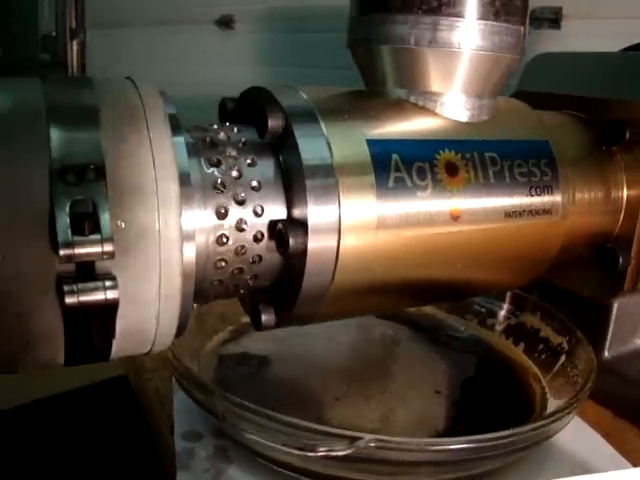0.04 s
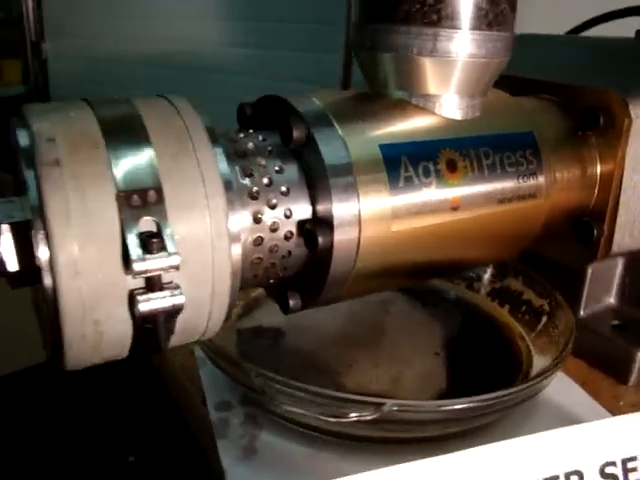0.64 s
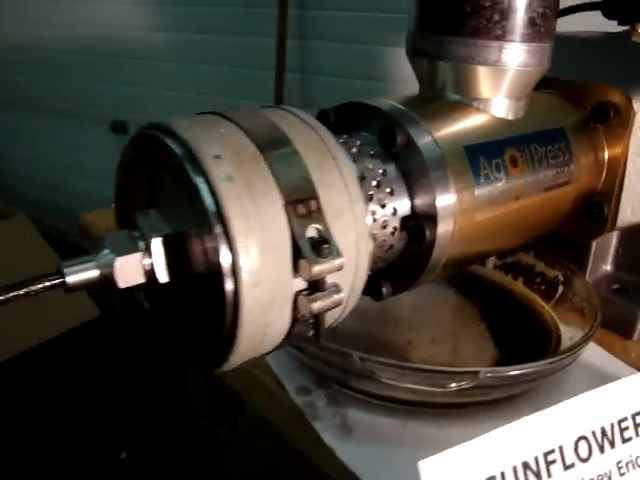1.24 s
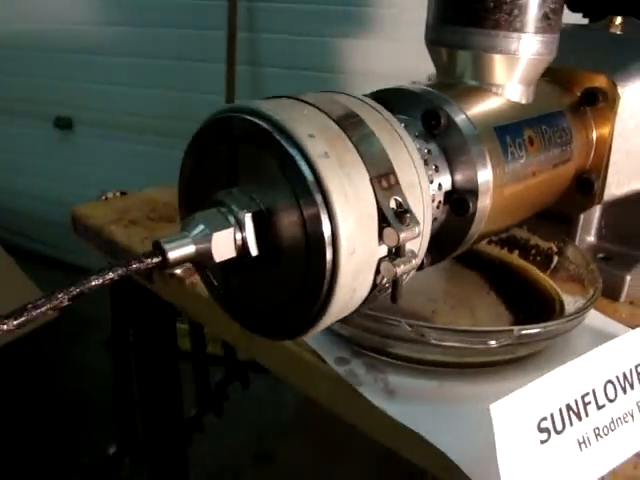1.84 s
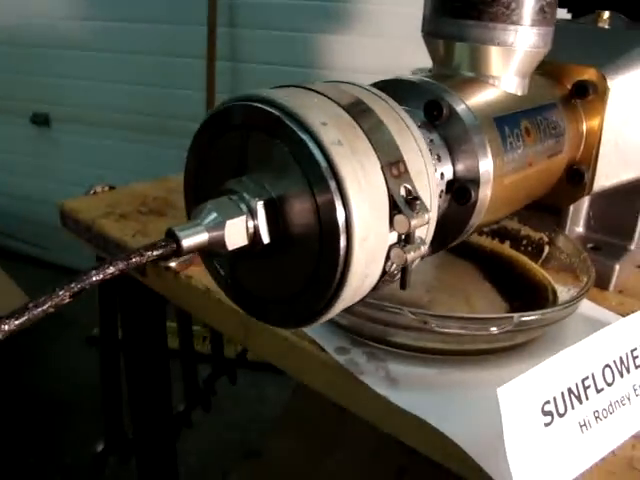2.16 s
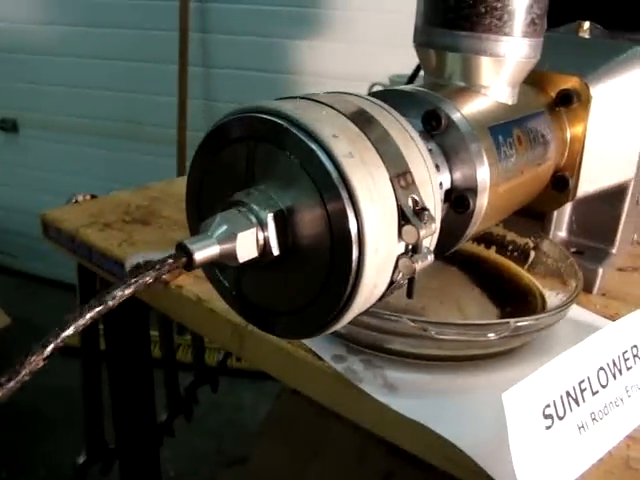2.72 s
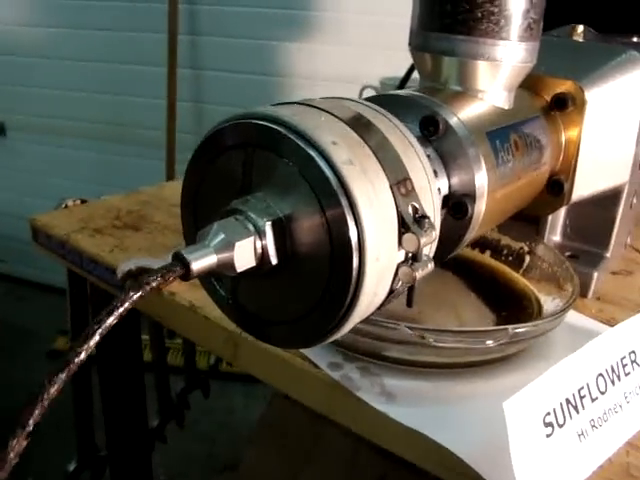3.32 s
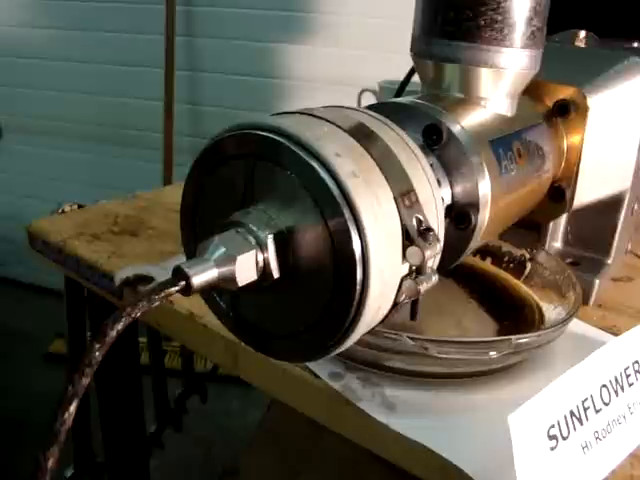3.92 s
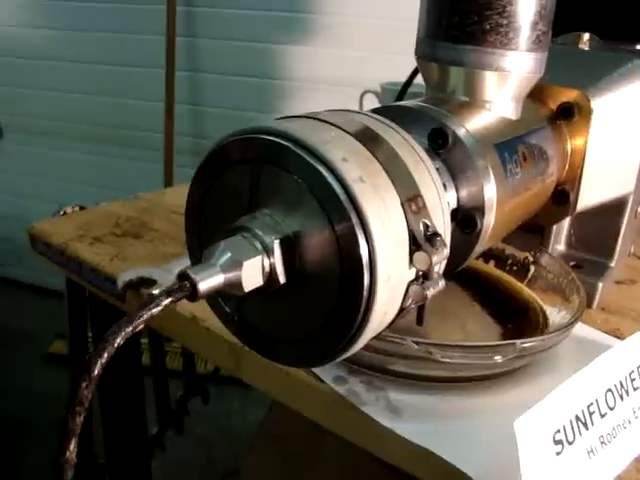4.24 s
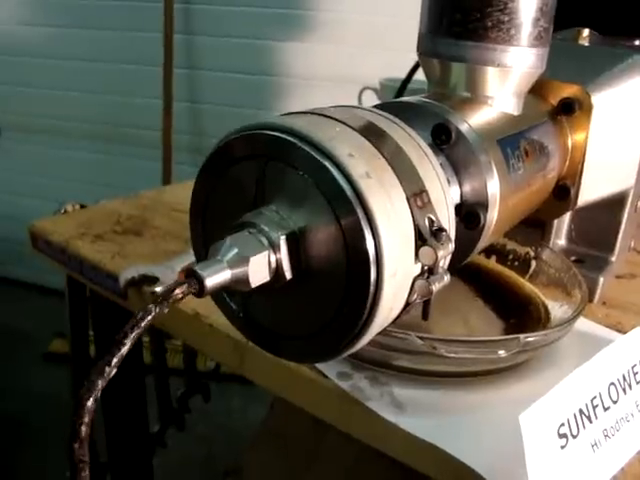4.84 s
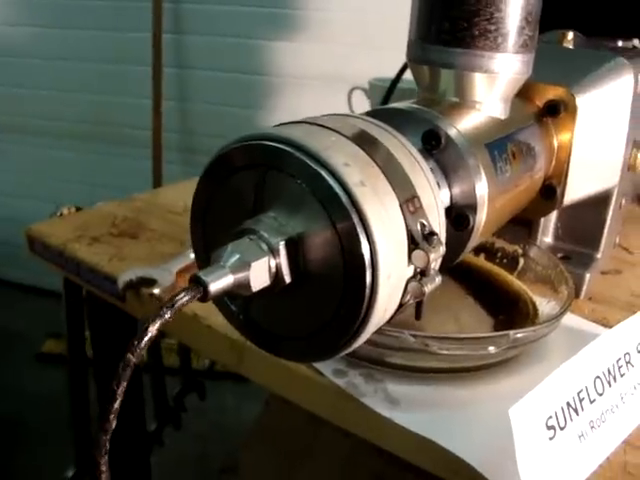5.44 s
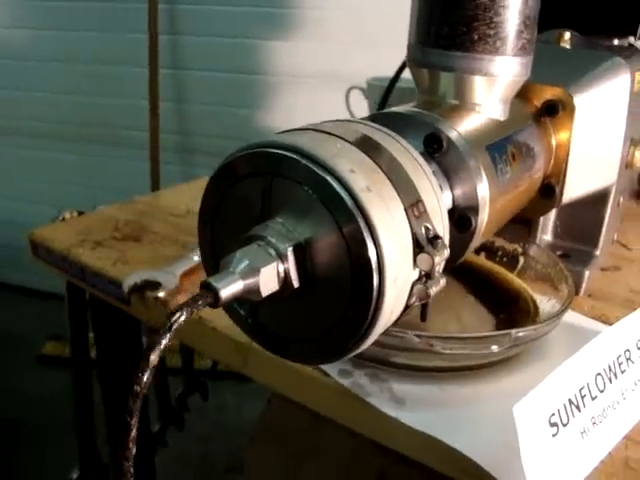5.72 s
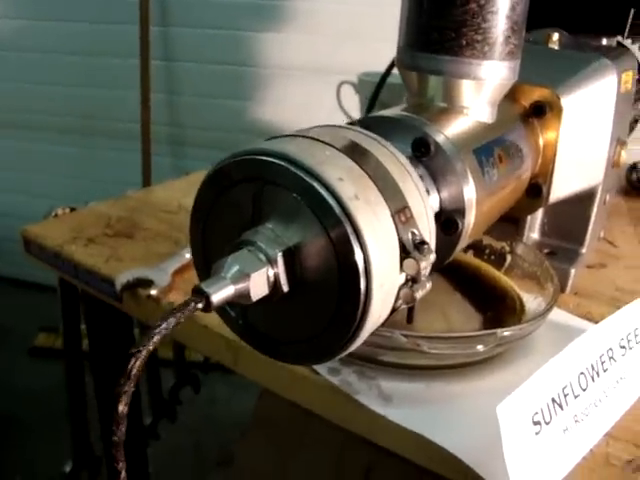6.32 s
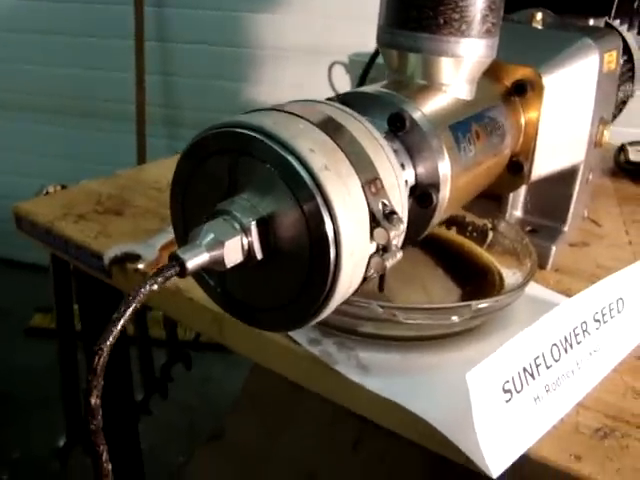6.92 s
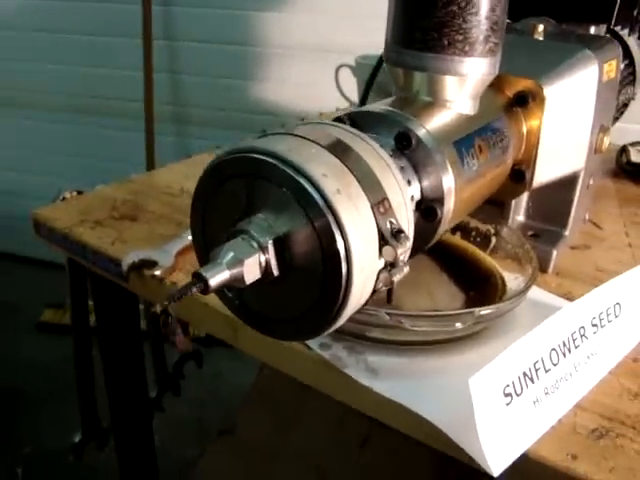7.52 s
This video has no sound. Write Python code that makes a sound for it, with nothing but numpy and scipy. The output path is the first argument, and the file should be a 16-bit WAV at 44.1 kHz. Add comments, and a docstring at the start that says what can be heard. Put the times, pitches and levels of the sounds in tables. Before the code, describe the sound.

An electric screw press runs close to the microphone in a workshop, its gearbox humming with a fast, rattling throb beneath a steady high motor whine. About half a second in, something hard bangs down and the room rings briefly. The machine dips in level, then recovers. Its tone shifts slightly as the microphone moves, while seed hulls crack faintly and the pressed cake crunches softly near the end.

```python
"""A workshop, with a camera microphone close to an electric screw press squeezing seeds. We start beside
the barrel: the gearbox growls once per shaft turn and the inverter-fed motor whines near 6 kHz.
At 0.4 s something hard bangs down, the room rings and the gain control ducks. The microphone swings
through the shadow of the press head round to the nozzle, while hulls crack faintly and the seed cake
rasps. The cake crunches near 5.9 s and crumbles off just after 7 s."""
import sys
import numpy as np
from scipy import signal
from scipy.fft import rfft, irfft, next_fast_len
from scipy.io import wavfile
from scipy.ndimage import uniform_filter1d, minimum_filter1d, map_coordinates

SR = 44100
rng = np.random.default_rng(int(sys.argv[2]) if len(sys.argv) > 2 else 0)


def persist_wave(psi):
    """Save psi, clipped to +-1, as 16-bit WAV."""
    counts = np.round(np.clip(psi, -1, 1) * 32767).astype(np.int16)
    wavfile.write(sys.argv[1], SR, np.atleast_2d(counts).T)


N = 338247

# Tones of the meshing gears: shaft_multiple, level_db
GEAR_TONES = [(13, -49.6), (14, -52.6), (16, -58), (17, -58), (20, -59), (22, -57), (26, -55), (27, -57),
              (39, -52), (40, -55), (45, -52), (46, -56), (47, -51), (48, -46.5), (49, -50), (50, -52),
              (51, -41.5), (52, -37.3), (57, -54), (64, -51), (65, -49), (70, -42), (72, -53), (73, -51),
              (74, -53), (75, -51), (76, -46), (77, -39.6), (78, -35), (79, -48), (80, -54), (81, -52),
              (83, -52), (84, -53), (85, -54), (86, -54), (89, -53), (107, -60)]
# Gear tones that change with microphone position: shaft_multiple, beside_barrel_db, in_shadow_db
GEAR_LOBES = [(13, 3.5, 0.5), (51, 1, 1.5), (52, 1.5, 4.5), (64, 5, 2), (65, 5, 2), (70, 4, 3),
              (77, -10, 1), (78, -3, -8.5)]
# Hum of mains, fan and slower gears, with thin metallic overtones: pitch_hz, level_db
HUM_TONES = [(112.4, -79), (119.8, -72), (279.3, -53), (342.5, -58), (360, -60.5), (460.3, -54.5),
             (466, -55.5), (519.5, -44), (592.8, -57.5), (666.7, -49), (669.5, -49.5), (755, -50),
             (757.4, -53), (853.5, -54.5), (1025.3, -50.5), (1040.3, -48), (1154, -52), (1530, -54),
             (1585.4, -56.5), (2148, -61.5), (2314.8, -54.3), (2352, -59.5), (2654, -61.5), (3548, -70.5),
             (3612, -65.5)]
# Broad spectrum of the gearbox rattle: frequency_hz, density_db_per_hz
RATTLE_SPECTRUM = [(25, -99), (110, -88.5), (155, -86), (185, -70.5), (450, -68), (520, -63.5),
                   (650, -67.5), (1250, -57.5), (1370, -67), (2000, -74), (3000, -77), (4300, -86.5),
                   (5000, -99.5)]
# Resonances of the gearbox housing: centre_hz, width_hz, lift_db
HOUSING_MODES = [(686, 208, 9), (1046, 120, 9), (1520, 29, 5), (2136, 176, 7.5), (2310, 82, 8),
                 (2693, 505, 6.5), (3067, 52, 8.5), (3743, 360, 8.5)]
# Inverter sidebands and their standing waves:
# supply_multiple, level_db, reflected_share, node_cm, node_spacing_cm
WHINE_SIDEBANDS = [(-5, -47.7, .58, 4.7, 6.55), (-1, -39.8, .36, 4.15, 5.9), (1, -38.1, .23, 1.68, 8.5),
                   (5, -39.2, .61, 1.68, 12.24)]
# Weaker tones of the motor's iron: pitch_hz, level_db, reflected_share, node_cm, node_spacing_cm
IRON_TONES = [(5451.9, -49.2, .36, 1, 9.8), (5629.6, -53.3, .44, 3.1, 6.6), (5799.8, -51.5, .3, 3.8, 5.5),
              (6373.2, -52, .35, 1, 5.4), (6550.8, -52.5, .55, 12.8, 26)]
# Switching hiss of the inverter: frequency_hz, density_db_per_hz
HISS_SPECTRUM = [(5050, -82.5), (5400, -78), (5500, -73.5), (5900, -73), (6200, -68.5), (6500, -72.5),
                 (6640, -80.5), (7100, -93.5), (8000, -88), (9000, -86), (10000, -97)]
# Level of the motor at the moving microphone: time_s, gain_db
MOTOR_LEVEL = [(0, 1), (.85, 1), (1.14, 0), (1.27, 1.5), (2.1, 0.6), (4.9, -0.5), (5.6, 0), (6.6, 1.3),
               (7.67, -1)]
# Colour of the whine as the microphone rounds the head: time_s, outer_sidebands_db, inner_sidebands_db
WHINE_COLOUR = [(0, -3, -2), (.7, -1.5, 1), (.95, 0, 1.5), (1.16, -7, 0), (1.25, 2.5, -1),
                (1.65, 1.5, -4.5), (2.1, -3, -3)]
# The hard thing's landing and bounce: start_s, gain_db
BLOWS = [(0.4126, 5.6), (0.422, 4.9)]
# Colour of one blow: frequency_hz, gain_db
THUD_SPECTRUM = [(30, -34.5), (130, -15.5), (300, -8.5), (550, -3.5), (1200, -6), (2200, -10),
                 (3500, -19.5), (5200, -29.5), (10000, -37.5)]
# Reflections off a surface close by and a far wall: delay_s, reflected_share
REFLECTIONS = [(.0031, .8), (.0383, .45)]
# Modes that ring after a blow: pitch_hz, width_hz, gain_db
STRUCK_MODES = [(342, 80, -9.5), (539, 5.8, 7), (554, 17, -6), (602, 66, -8.5), (660, 8.6, -10),
                (973, 12, -1), (1190, 4, 0), (1690, 4, 1), (2137, 4, 1.5)]
# The loudest cracks of hulls and cake: start_s, level_db, pitch_hz, width_hz
LOUD_CRACKS = [(.123, -36, 3500, 2500), (.256, -40, 4000, 1500), (.2565, -46, 8200, 2500),
               (.865, -28.5, 2300, 2200), (.914, -44, 6300, 4000), (1.531, -38, 2900, 500),
               (1.895, -48, 8500, 2500), (3.2445, -31, 2950, 400), (4.6397, -39, 9700, 1500),
               (5.3537, -45.5, 9900, 1300), (5.826, -38, 2950, 900), (5.858, -32, 4200, 1000),
               (5.865, -35.5, 3700, 2000), (5.881, -45, 7900, 1500), (6.236, -37, 3350, 800),
               (6.433, -39, 3100, 1200), (6.881, -37, 4650, 900), (7.1608, -35, 7950, 1200),
               (7.2578, -37, 9400, 2200), (7.4425, -42.5, 9200, 3500), (7.4435, -32.5, 4250, 700)]
# Gritty crunches of the cake: centre_s, spread_s, crack_level_db, pitch_hz
CAKE_CRUNCHES = [(5.86, .022, -44, 3900), (7.32, .012, -51, 8500)]
# The cake rasping in the nozzle: centre_s, half_length_s, gain_db
CAKE_RASPS = [(1.72, .2, -1), (3.632, 0.14, -1.5), (5.634, 0.081, 1.5)]
# Colours of the seed's sizzle and the cake's rasp: frequency_hz, gain_db
SIZZLE_SPECTRUM = [(2500, -3.5), (4500, 3), (6800, -9.0), (8000, 2.5), (10000, -5.0)]
RASP_SPECTRUM = [(1500, -15), (3800, 8.5), (4800, 7.5), (7000, -6), (10000, -7.5)]
# Reverberation of the workshop: frequency_hz, t60_s
ROOM_DECAY = [(150, 0.98), (500, 0.75), (1500, 0.75), (3000, 0.77), (9000, 0.54)]
# The microphone swings from beside the barrel round to the nozzle, then drifts: time_s, travel_cm
MIC_PATH = [(0, 0), (.5, 1.2), (1.2, 5.3), (2.4, 9.86), (4.9, 11), (5.4, 13.67), (7.67, 16.8)]

SHAFT_HZ, SPEED_SWING_HZ, GEAR_RATIO = 14.337, .015, 23.5  # ratio: motor turns per turn of the screw
CARRIER_HZ, SUPPLY_HZ = 6001.4, 29.54  # the inverter's switching rate and the supply it makes


def gearbox(tight_spot_turns=.75, clatter_lag_turns=.67, tones_db=-.5, rattle_db=-4.5):
    """Gear tones and rattle swell around the tight spot of each turn, over the machine's hum."""
    _, beside, shadow = mic_position()
    turn = shaft_turns() - tight_spot_turns + .00051 * wobble(9)  # the load tugs at the shaft
    tones = amp(tones_db) * gear_tones(turn, beside, shadow)
    rattle = noise(housing) * amp(rattle_db + .47 * wobble(30))
    sound = tones + rattle + tooth_errors(turn) + screw_groan(turn)
    # Three bands radiate in different directions, and each throbs at its own point of the turn.
    drone = filtered(sound, lambda hz: 1 / (1 + (hz / 880) ** 16))
    mesh = filtered(sound - drone, lambda hz: 1 / (1 + (hz / 1400) ** 16))
    clatter = sound - drone - mesh
    drone_db = 4.5 * beside + .5 * np.cos(2 * np.pi * turn)
    mesh_db = -3 * shadow + .66 * np.sin(2 * np.pi * turn)
    clatter_db = beside + .5 * np.cos(2 * np.pi * (turn - clatter_lag_turns))
    return amp(drone_db) * drone + amp(mesh_db) * mesh + amp(clatter_db) * clatter + hum()


def gear_tones(turn, beside, shadow, waver_db=1.3):
    """Meshing teeth sing at multiples of the shaft speed; some tones beam to one side."""
    multiples, levels_db = np.transpose(GEAR_TONES)
    # Strong tones beat in step, the upper ones a quarter turn after the lower; weak ones stray.
    stray = (multiples > 14) & (levels_db < -44)
    lags = .005 * np.maximum(multiples - 50, 0) ** 2 + stray * rng.random(len(multiples))
    lobe_db = {k: side_db * beside + shade_db * shadow for k, side_db, shade_db in GEAR_LOBES}
    return sum(tone(k * turn - lag, db + lobe_db.get(k, 0) + waver_db * wobble(2.78))
               for k, db, lag in zip(multiples, levels_db, lags))


def tooth_errors(turn, lift_db=2.5, scatter_db=2.0, size=8192):
    """Uneven teeth repeat the same rough pattern every turn: a dense comb of weak tones."""
    multiples = np.arange(12, 170)
    db = housing(multiples * SHAFT_HZ) + lift_db + scatter_db * rng.standard_normal(len(multiples))
    comb = np.zeros(size // 2 + 1, complex)
    comb[multiples] = amp(db) * np.exp(2j * np.pi * rng.random(len(multiples)))
    comb[[round(k) for k, _ in GEAR_TONES]] = 0
    one_turn = irfft(comb) * size / np.sqrt(2)
    return np.interp(turn % 1, np.arange(size) / size, one_turn)


def housing(hz):
    """What the gearbox radiates, in dB per Hz: a broad rattle lifted by the housing's resonances."""
    lift_db = sum(db * np.exp(-(2 * (hz - centre) / width) ** 2) for centre, width, db in HOUSING_MODES)
    return along(RATTLE_SPECTRUM, hz) + lift_db - 20 * np.log10(1 + (hz / 5600) ** 12)


def screw_groan(turn, pitch_hz=271.0, level_db=-46.0, slack_db=-16):
    """A low groan under load that lets go briefly once per slow turn of the screw."""
    screw_turn = turn / GEAR_RATIO
    slack = (.5 + .5 * np.cos(2 * np.pi * screw_turn)) ** 3
    return tone(pitch_hz * np.arange(N) / SR, level_db + slack_db * slack)


def shaft_turns():
    """Turns of the motor shaft; the load slows it a little once per turn of the screw."""
    screw_turn = SHAFT_HZ / GEAR_RATIO * np.arange(N) / SR
    return np.cumsum(SHAFT_HZ + SPEED_SWING_HZ * np.cos(2 * np.pi * screw_turn)) / SR


def motor(whine_db=1.5, shadow_db=-3, waver_db=1.5, iron_waver_db=3.0, twist_cycles=.14):
    """The inverter's carrier, split by the supply frequency, sings in the motor's iron."""
    t = np.arange(N) / SR
    travel_cm, beside, shadow = mic_position()
    outer_db, inner_db = curves(WHINE_COLOUR)
    whine = np.zeros(N)
    for k, db, *wave in WHINE_SIDEBANDS:
        # The twist sets outer sidebands against inner ones, so the buzz has notches instead of peaks.
        cycles = (CARRIER_HZ + k * SUPPLY_HZ) * t + twist_cycles * abs(k)
        colour_db = outer_db if abs(k) > 1 else inner_db
        level_db = db + whine_db + colour_db + waver_db * wobble(12)
        whine += standing_wave(cycles, level_db, travel_cm, *wave)
    iron = sum(standing_wave(hz * t + rng.random(), db + iron_waver_db * wobble(3.4), travel_cm, *wave)
               for hz, db, *wave in IRON_TONES)
    gain_db, = curves(MOTOR_LEVEL)
    return amp(gain_db) * (amp(shadow_db * shadow) * (whine + iron) + switching_hiss(beside))


def standing_wave(cycles, db, travel_cm, share, node_cm, spacing_cm):
    """A tone meets its own reflection: level and phase shift as the microphone crosses the nodes."""
    wave = 1 - share * np.exp(2j * np.pi * (travel_cm - node_cm) / spacing_cm)
    return np.abs(wave) * tone(cycles + np.angle(wave) / (2 * np.pi), db)


def switching_hiss(beside, gain_db=-.5, beside_db=1.5):
    """Switching jitter makes a band of hiss around the whine, stronger from the side."""
    def density(hz):
        skirts = (1 + (4900 / (hz + 1)) ** 16) * (1 + (hz / 7200) ** 30)
        return along(HISS_SPECTRUM, hz) - 20 * np.log10(skirts)
    return noise(density) * amp(gain_db + beside_db * beside)


def bang(level_db=22, direct_db=-3.5, ring_db=13, room_db=9.0):
    """A hard thing lands and bounces with a hollow knock; surfaces mirror it, then the room rings."""
    def modes(f):
        return sum(amp(db) * resonance(f, hz, width) for hz, width, db in STRUCK_MODES)
    sound = np.zeros(N)
    for start_s, gain_db in BLOWS:
        thud = amp(level_db + gain_db) * sharp_impulse(THUD_SPECTRUM)
        blow = np.pad(thud, (round(start_s * SR), N))[:N]
        knock = blow + filtered(blow, lambda f: resonance(f, hz=1000, width_hz=880) ** 2)
        direct = knock + sum(share * np.roll(knock, round(s * SR)) for s, share in REFLECTIONS)
        ring = filtered(blow, modes)
        # The deep push of the blow does not linger in the room.
        spread = filtered(blow, lambda f: resonance(f, hz=1620, width_hz=4000))
        sound += amp(direct_db) * direct + amp(ring_db) * ring + amp(room_db) * workshop(spread)
    return sound


def hulls(faint_per_s=1.6, cracks_per_crunch=12, splinters=2, splinter_db=-11, gap_s=.0025, room_db=-8):
    """Hulls and cake crack, singly or in crunches; ever weaker splinters follow, and a little room."""
    def small_crack(start_s, db, hz, width_hz=1200):
        level_db = db + 2 * rng.standard_normal()
        pitch_hz = hz * np.exp(.28 * rng.standard_normal())
        return start_s, level_db, pitch_hz, width_hz
    crunches = [small_crack(centre_s + spread_s * rng.standard_normal(), db, hz)
                for centre_s, spread_s, db, hz in CAKE_CRUNCHES for _ in range(cracks_per_crunch)]
    faint = [small_crack(rng.random() * N / SR, db=-48.5, hz=4200)
             for _ in range(round(faint_per_s * N / SR))]
    sound = np.zeros(N + SR)
    for start_s, level_db, pitch_hz, width_hz in LOUD_CRACKS + crunches + faint:
        snap = amp(level_db) * crack(pitch_hz, width_hz)
        for k in range(splinters + 1):
            sound[round(start_s * SR):][:len(snap)] += amp(splinter_db * k) * snap
            start_s += gap_s * (.5 + rng.random())
    return sound[:N] + amp(room_db) * workshop(sound[:N])


def crack(pitch_hz, width_hz, size=4096):
    """One sudden split rings in a broad resonance, with the energy of 2 ms at rms 1."""
    snap = irfft(resonance(np.fft.rfftfreq(size, 1 / SR), pitch_hz, width_hz) ** 2)
    return snap / np.linalg.norm(snap) * np.sqrt(.002 * SR)


def seeds(crumble_s=7.12, rise_s=.17, fall_s=.29, crumble_db=5.5, beside_db=5, grain_db=1.5):
    """Squeezed seed sizzles, swelling as the rope of cake breaks off; now and then the cake rasps."""
    t = np.arange(N) / SR
    _, beside, _ = mic_position()
    since_s = t - crumble_s
    crumble = np.exp(-(since_s / np.where(since_s < 0, rise_s, fall_s)) ** 2)
    sizzle = noise(lambda hz: along(SIZZLE_SPECTRUM, hz) - 95)
    sizzle *= amp(beside_db * beside + crumble_db * crumble)
    rasp = noise(lambda hz: along(RASP_SPECTRUM, hz) - 94)
    rasp *= sum(amp(db) * np.exp(-((t - s) / half_s) ** 2) for s, half_s, db in CAKE_RASPS)
    return (sizzle + rasp) * amp(grain_db * wobble(60))


def hum(waver_db=2.25):
    """Mains, fan and slower gears hold steady pitches whose levels waver."""
    t = np.arange(N) / SR
    return sum(tone(hz * t + rng.random(), db + waver_db * wobble(4.04)) for hz, db in HUM_TONES)


def workshop(x, build_up_s=.0075):
    """The room's diffuse answer: each frequency dies at its own speed."""
    hz, t, spectrum = signal.stft(rng.standard_normal(SR), SR, nperseg=256)
    decay = amp(-60 * t / along(ROOM_DECAY, hz)[:, None])
    onset = 1 - np.exp(-t / build_up_s)
    _, tail = signal.istft(spectrum * decay * onset, SR, nperseg=256)
    return signal.fftconvolve(x, tail / np.linalg.norm(tail))[:N]


def mic_position(nozzle_cm=10.6, shadow_cm=5.8, shadow_width_cm=2.3):
    """Travel in cm, how far beside the barrel (0-1) and how deep in the head's shadow (0-1)."""
    travel_cm, = curves(MIC_PATH)
    beside = np.maximum(1 - travel_cm / nozzle_cm, 0)
    shadow = np.exp(-((travel_cm - shadow_cm) / shadow_width_cm) ** 2)
    return travel_cm, beside, shadow


def amp(db):
    """Decibels to gain."""
    return 10 ** (np.asarray(db) / 20)


def along(points, hz):
    """Interpolate (frequency_hz, value) points on a log frequency axis."""
    f, values = np.transpose(points)
    return np.interp(np.log(hz + 1), np.log(f + 1), values)


def curves(rows):
    """One value per sample for each column after the time."""
    time_s, *columns = np.transpose(rows)
    return [np.interp(np.arange(N) / SR, time_s, column) for column in columns]


def wobble(knots_per_s):
    """A smooth random curve."""
    coarse = np.linspace(0, N, num=2048)
    knots = rng.standard_normal(size=512)
    smooth = map_coordinates(knots, [coarse * knots_per_s / SR], mode="wrap")
    return np.interp(np.arange(N), coarse, smooth)


def filtered(x, response):
    """Pass x through a frequency response."""
    size = next_fast_len(N + SR // 2)
    return irfft(rfft(x, size) * response(np.fft.rfftfreq(size, 1 / SR)), size)[:N]


def noise(density):
    """Noise with the given dB per Hz."""
    return filtered(rng.standard_normal(N), lambda hz: amp(density(hz)) * np.sqrt(SR / 2))


def resonance(f, hz, width_hz):
    """Causal response of one mode."""
    return 1j * f * width_hz / (hz * hz - f * f + 1j * f * width_hz)


def sharp_impulse(spectrum, size=4096):
    """The sharpest causal impulse that has this colour (minimum phase)."""
    gain = amp(along(spectrum, np.fft.rfftfreq(size, 1 / SR)))
    cepstrum = irfft(np.log(gain))
    cepstrum[1:size // 2] *= 2
    cepstrum[size // 2 + 1:] = 0
    return irfft(np.exp(rfft(cepstrum)))


def tone(cycles, db):
    """A sine of the given rms level."""
    return np.sqrt(2) * amp(db) * np.cos(2 * np.pi * cycles)


def scene():
    """The running press and the bang as they reach the microphone, in mono."""
    return (gearbox() + motor() + seeds() + bang() + hulls())[None]


def gain_control(x, ceiling_db=-3, recovery_db_per_s=18, smooth_samples=89):
    """A peak over the ceiling pulls the gain down at once; it then climbs steadily back."""
    excess_db = np.maximum(20 * np.log10(np.abs(x) + 1e-9) - ceiling_db, 0)
    ramp_db = recovery_db_per_s * np.arange(N) / SR
    gain_db = ramp_db - np.maximum.accumulate(excess_db + ramp_db)
    held_db = minimum_filter1d(gain_db, smooth_samples)
    return x * amp(uniform_filter1d(held_db, smooth_samples))


def record(dry):
    """The microphone feeds the camera's gain control and band limit."""
    return filtered(gain_control(dry[0]), lambda hz: hz < 10170)[None]


dry = scene()
out = record(dry)
persist_wave(out)
```